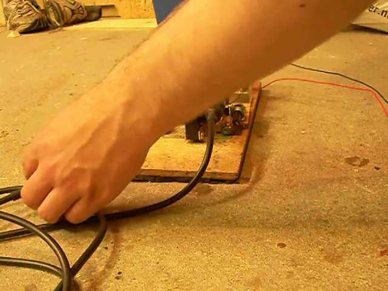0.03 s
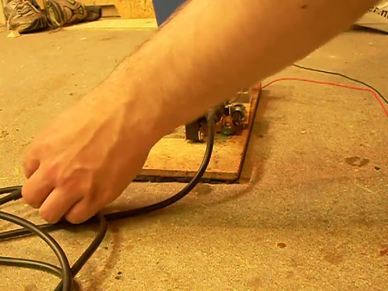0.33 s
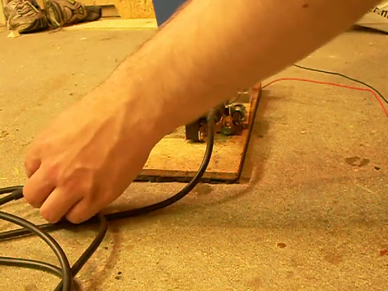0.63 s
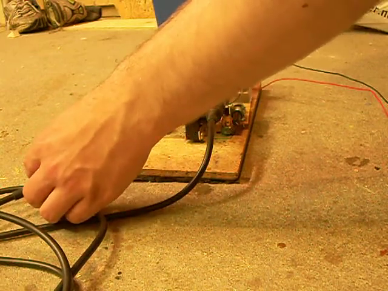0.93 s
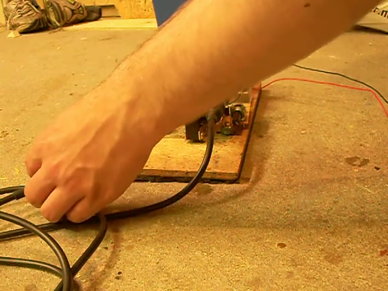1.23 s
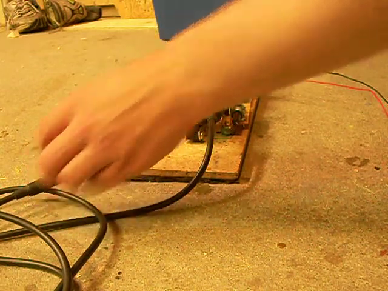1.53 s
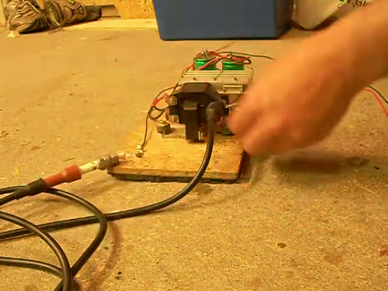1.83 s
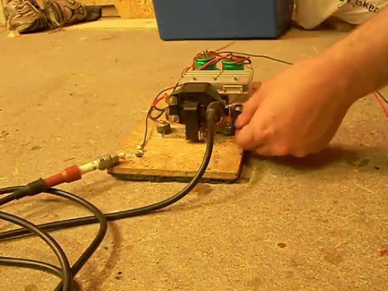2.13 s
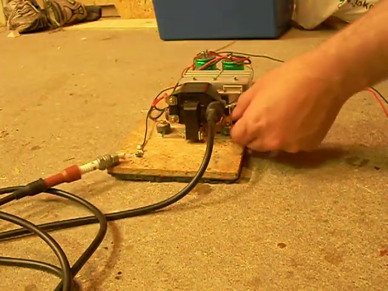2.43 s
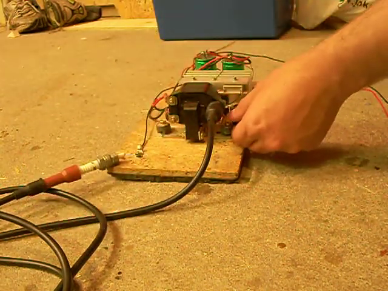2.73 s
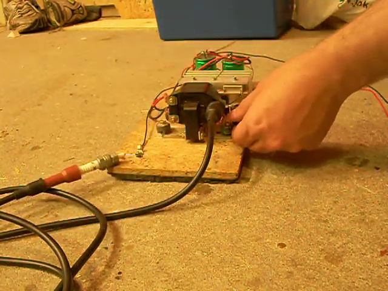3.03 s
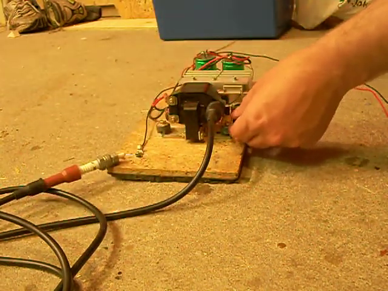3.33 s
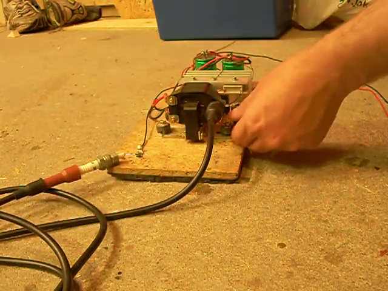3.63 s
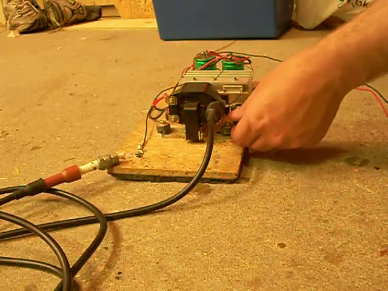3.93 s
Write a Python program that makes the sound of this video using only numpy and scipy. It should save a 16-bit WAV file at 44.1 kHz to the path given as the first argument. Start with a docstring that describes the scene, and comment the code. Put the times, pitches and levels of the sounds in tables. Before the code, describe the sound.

An electric spark buzzes at a spark plug, close by in a workshop. First a coil ticks faintly and rapidly, with sharp snaps near 0.6 and 1 second. At 1.1 the spark catches into a harsh buzz lasting until 4, changing tone around 1.6. Its pitch rises slightly from 2.6 and settles by 3.3. Fingers softly bump wood four times between 2.2 and 3.5, over faint rumble and hiss.

```python
"""An electric spark buzzes at a spark plug as a homemade driver pulses a coil about 82 times a second.
At first the coil only ticks and a few lone sparks snap over; then the spark catches, and its quick
cracks blend into a buzz. A hand uncovers the plug, changing the tone, then turns the pulse rate up and
down with a knob. Fingers bump a wooden board, and the workshop rumbles and hisses faintly.
The high treble is lost, and the loudest cracks overload."""
import sys
import numpy as np
from scipy import signal
from scipy.fft import rfft, irfft, next_fast_len
from scipy.io import wavfile
from scipy.ndimage import uniform_filter1d, map_coordinates

SR = 44100
rng = np.random.default_rng(int(sys.argv[2]) if len(sys.argv) > 2 else 0)


def digitize_waveform(pressure):
    """Quantize a signal to 16-bit integers and store it at the path in sys.argv[1].

    Rows of a 2-D input are taken as channels; values are limited to [-1, 1].
    """
    field = np.atleast_2d(pressure).T
    bounded = np.clip(field, -1, 1)
    quanta = np.round(bounded * 32767).astype(np.int16)
    wavfile.write(sys.argv[1], SR, quanta)


N = 176400  # 4 seconds

# tone of the room's rumble and of its hiss (frequency [Hz], relative level [dB])
RUMBLE_TONE = [(12, -31), (20, -1.5), (117, -2.5), (173, -6), (295, -9), (338, -14), (369, -11),
               (700, -22.5), (910, -54.5), (1540, -120)]
HISS_TONE = [(300, -3), (700, -1.5), (2000, -5), (4000, -7), (4500, -1.5), (5100, -9), (5600, -18.5),
             (6300, -31.5)]
# how long the room rings; a fade time, or t60, is the time to drop 60 dB (frequency [Hz], fade time [s])
ROOM_FADE = [(400, 0.16), (1500, 0.28), (3500, 0.32), (6000, 0.24)]
# notes at which the room and the board ring (frequency [Hz], relative level [dB], fade time [s])
ROOM_NOTES = [(514, -42, .2), (637, -39.5, 0.18), (782, -38, 0.24), (999, -43.5, 0.18)]
BOARD_NOTES = [(600, 2, 0.061), (800, -2, 0.045), (1190, -1, 0.044)]
# fingers bumping the board (time [s], peak level [dB])
BUMPS = [(2.179, -30), (2.448, -24.5), (3.079, -20.5), (3.459, -24)]
# how often the driver fires the coil (time [s], rate [Hz])
PULSE_RATE = [(0, 82.3), (1.0, 82.35), (1.1, 81.66), (2.57, 81.65), (2.7, 85.9), (2.82, 90), (2.9, 91.6),
              (3.01, 91.7), (3.1, 89.2), (3.21, 84), (3.29, 81.68)]
# strength of the ticking (time [s], level [dB])
TICK_LEVEL = [(0, -43.5), (.35, -43), (.52, -38.5), (.75, -38.5), (.86, -38), (.96, -39), (1.1, -33)]
# ticks that are harder than the rest (time [s], extra level [dB])
HARD_TICKS = [(.369, 2), (.442, 3.5), (.831, 3.5), (.843, 6.5), (.904, 4), (.928, 7.5), (1.001, 4.5)]
# lone sparks before the buzz starts (time [s], level [dB])
SNAPS = [(.5394, -18), (.6002, -20), (.6123, -17), (0.6248, -16.5), (1.0255, -16.5), (1.0735, -18)]
# tone of a tick and of a lone spark (frequency [Hz], relative level [dB])
TICK_TONE = [(350, -31), (700, -13.5), (1000, -10.5), (1300, -15), (1800, -2), (2200, -7.5), (2750, -0.5),
             (3200, -3), (3600, -4), (4200, -4.5), (4800, -6), (5200, -15.5), (5600, -26), (6300, -34)]
SNAP_TONE = [(200, -26.5), (400, -19), (600, -13), (800, -13), (1000, -6), (1350, -10.5), (1850, -4.5),
             (2600, -1.5), (3500, -1), (3900, -2), (4400, 4), (5100, 0.5), (5600, -15), (6300, -28.5)]
# strength of the buzzing spark (time [s], level [dB])
SPARK_LEVEL = [(1.1, -17), (1.25, -16.5), (1.4, -15.5), (1.46, -17), (1.52, -15.5), (1.58, -18), (2.0, -19),
               (2.55, -19.5), (2.65, -19.5), (2.82, -20), (2.97, -19), (3.1, -20), (3.3, -20),
               (3.65, -20.5), (4.0, -19.5)]
# how much of the plug the hand has uncovered (time [s], share [0-1])
UNCOVERED = [(1.55, 0.04), (1.62, 0.6), (1.82, 0.85)]
# how late the echo off the moving hand arrives (time [s], delay [s])
HAND_DELAY = [(1.1, 0.00062), (1.5, 0.0006), (1.62, 0.0012), (1.85, .0019), (2.1, 0.0022), (3.3, .0021),
              (3.65, 0.00219), (3.8, 0.002), (4.0, 0.0024)]
# harmonics of the buzz, plug covered and plug open (multiple of IDLE_HZ [number], relative level [dB])
COVERED_HARMONICS = [(1, -32.5), (2, -24), (3, -22.5), (4, -21.5), (5, -17.5), (6, -21.5), (7, -14),
                     (8, -28), (9, -19), (10, -15), (11, -19), (12, -11.5), (13, -15.5), (14, -17),
                     (15, -19), (16, -18), (17, -16), (18, -16.5), (19, -16), (20, -15.5), (21, -10.5),
                     (22, -11), (23, -11), (24, -22), (25, -9), (26, -22.5), (27, -10), (28, -16.5),
                     (29, -23.5), (30, -11), (31, -6.5), (32, -14.5), (33, -4.5), (34, -10), (35, -11.5),
                     (36, -8), (37, -27), (38, -16), (39, -12.5), (40, -10), (41, -10), (42, -13),
                     (43, -9.5), (44, -2.5), (45, -11), (46, -9), (47, -2), (48, -25), (49, -28), (50, -13),
                     (51, -1.5), (52, 0), (53, 2.5), (54, 1), (55, -17), (56, -17.5), (57, -7.5),
                     (58, -6.5), (59, -4), (60, -12), (61, -12), (62, -3), (63, -18), (64, -11), (65, -16),
                     (66, -19.5), (67, -29), (68, -39), (69, -15.5), (70, -22), (71, -24), (72, -31.5),
                     (73, -25), (74, -37.5)]
OPEN_HARMONICS = [(1, -28), (2, -27.5), (3, -25.5), (4, -22), (5, -18.5), (6, -21.5), (7, -12), (8, -17.5),
                  (9, -22), (10, -17), (11, -25.5), (12, -14.5), (13, -10), (14, -13), (15, -19),
                  (16, -15.5), (17, -24), (18, -26), (19, -34), (20, -15), (21, -11), (22, -14.5),
                  (23, -16), (24, -14.5), (25, -7), (26, -16.5), (27, -13.5), (28, -19.5), (29, -10),
                  (30, -24), (31, -7.5), (32, -13), (33, -5), (34, -8), (35, -27), (36, -3.5), (37, -27),
                  (38, -16), (39, -16), (40, -12.5), (41, -3), (42, -4.5), (43, -2), (44, -3), (45, -3.5),
                  (46, -12), (47, -8.5), (48, -9), (49, -12), (50, -1), (51, -13), (52, -6), (53, -4.5),
                  (54, -3.5), (55, 0), (56, -5.5), (57, -9.5), (58, 0), (59, -6), (60, -1), (61, -8),
                  (62, -4), (63, -5.5), (64, -11.5), (65, -13), (66, -20), (67, -16), (68, -25),
                  (69, -30.5), (70, -20), (71, -23.5), (72, -25), (73, -23.5), (74, -32)]
# how the room colours the ring of the buzzing spark (frequency [Hz], boost [dB])
ROOM_COLOUR = [(250, 2), (400, 2.5), (520, 2), (800, 4.5), (1100, 0.5), (1800, 0), (2700, -0.5),
               (3500, -1.5), (4300, 1), (5200, 0.5)]

IDLE_HZ, CATCH_S, MISFIRE_S = 81.65, 1.0982, 1.307  # resting pulse rate, start of the buzz, missed spark
JITTER_S, SPARK_SCATTER_DB, TICK_SCATTER_DB = 3e-6, 0.57, 0.95  # random change from pulse to pulse
HAND_SWAY_S, HAND_ECHO_DB = 2.5e-5, -17
EARLY_LEAN = 0.48  # tone shaping acts most at the start of each crack (0-1)
RUMBLE_DB, HISS_DB = -42, -46.5
SOFT_LIMIT, HARD_LIMIT, TREBLE_EDGE_HZ, TOP_HZ = 0.76, 0.6, 6000, 16000


def amp(db):
    """Turn decibels into a number to multiply by."""
    return 10 ** (np.asarray(db) / 20)


def unit(x):
    """Scale a sound to an average strength (rms) of 1."""
    return x / np.sqrt(np.mean(x ** 2) + 1e-20)


def at_frequency(points, hz):
    """Read between the rows of a (frequency, value) table, on a log scale of frequency."""
    frequencies, values = np.transpose(points)
    return np.interp(np.log(hz + 1), np.log(frequencies + 1), values)


def at_time(points, times):
    """Read between the rows of a (time, value) table."""
    return np.interp(times, *np.transpose(points))


def filtered(x, gain_at):
    """Multiply each frequency in a sound by gain_at(frequency)."""
    size = next_fast_len(N + SR // 2)
    return irfft(rfft(x, size) * gain_at(np.fft.rfftfreq(size, 1 / SR)), size)[:N]


def coloured(x, tone):
    """Give a sound a tone, using a filter that rings only after each click, never before."""
    size = 8192
    cepstrum = irfft(np.log(amp(at_frequency(tone, np.fft.rfftfreq(size, 1 / SR)))))
    cepstrum[1:size // 2] *= 2  # move the early half of the ringing to after the click
    cepstrum[size // 2 + 1:] = 0
    ring = irfft(np.exp(rfft(cepstrum)))[:size // 2]
    return signal.fftconvolve(x, ring)[:len(x)]


def clicks(times, sizes):
    """Sharp clicks at exact times, even between two samples."""
    index = np.floor(times * SR).astype(int)[:, None] + np.arange(-7, 9)
    offset = index - times[:, None] * SR
    taps = sizes[:, None] * np.sinc(offset) * np.cos(np.pi * offset / 16) ** 2
    return np.bincount(np.clip(index, 0, N).ravel(), taps.ravel(), N + 1)[:N]


def played(train, sound):
    """Play the sound once for every click in the train."""
    return signal.fftconvolve(train, sound)[:N]


def unit_when_repeated(sound):
    """Scale a short sound so that repeating it at the resting rate gives an rms near 1."""
    return sound / np.linalg.norm(sound) * np.sqrt(SR / IDLE_HZ)


def ringing(notes, t):
    """Add up pure tones that each die away."""
    return sum(amp(db - 60 * t / t60) * np.sin(2 * np.pi * hz * t) for hz, db, t60 in notes)


def background():
    """The room's low rumble and faint hiss: two steady, filtered noises."""
    def noise(tone):
        return unit(filtered(rng.standard_normal(N), lambda hz: amp(at_frequency(tone, hz))))
    return amp(RUMBLE_DB) * noise(RUMBLE_TONE) + amp(HISS_DB) * noise(HISS_TONE)


def workshop(near_db, near_t60, room_db, echoes=()):
    """A click in the room: direct sound, scatter off the nearby board, echoes and a ringing tail."""
    hz, frame_times, spectrum = signal.stft(rng.standard_normal(SR // 2), SR, nperseg=256)
    fade = amp(-60 * frame_times / at_frequency(ROOM_FADE, hz)[:, None])
    tail = signal.istft(spectrum * fade, SR, nperseg=256)[1]
    t = np.arange(len(tail)) / SR
    tail *= 1 - np.exp(-t / 0.0059)  # the tail takes a moment to build
    near = rng.standard_normal(len(t)) * amp(-60 * t / near_t60) * (1 - np.exp(-t / 0.00028))
    sound = (amp(near_db) * unit(near) + amp(room_db) * unit(tail)) / np.sqrt(len(t))
    sound[0] += 1  # the direct sound
    for delay_s, gain in echoes:
        sound[round(delay_s * SR)] += gain
    return sound / np.linalg.norm(sound) + amp(room_db - 9.5) * ringing(ROOM_NOTES, t)


def finger_bumps():
    """Fingers knock softly on the wooden board, which rings briefly."""
    ring = ringing(BOARD_NOTES, np.arange(SR // 4) / SR)
    times, db = np.transpose(BUMPS)
    return played(clicks(times, amp(db)), ring / abs(ring).max())


def driver_firings():
    """The times when the driver fires the coil, once per cycle."""
    t = np.arange(N) / SR
    cycles = np.cumsum(at_time(PULSE_RATE, t)) / SR
    cycles -= np.interp(CATCH_S, t, cycles)  # one firing lands just as the spark catches
    return np.interp(np.arange(np.ceil(cycles[0]), cycles[-1]), cycles, t)


def coil_ticks(firings):
    """Until the spark catches, each firing gives a small dry tick."""
    times = firings[firings < CATCH_S]
    db = at_time(TICK_LEVEL, times) + TICK_SCATTER_DB * rng.standard_normal(len(times))
    for when, extra_db in HARD_TICKS:
        db[np.argmin(abs(times - when))] += extra_db
    train = clicks(times + rng.normal(0, 8e-6, len(times)), amp(db))
    tick = coloured(workshop(near_db=-7.5, near_t60=0.014, room_db=-4.5), TICK_TONE)
    return played(train, unit_when_repeated(tick))


def lone_sparks():
    """A few sparks jump before the buzz starts, each a dry snap that the room answers."""
    times, db = np.transpose(SNAPS)
    snap = coloured(workshop(near_db=-0.5, near_t60=0.01, room_db=-3.0), SNAP_TONE)
    return played(clicks(times, amp(db)), unit_when_repeated(snap))


def spark_crack(room, harmonics):
    """One spark in the room, shaped so that repeating it gives roughly the listed harmonics."""
    multiple, db = np.transpose(harmonics)
    hz, period = np.round(multiple) * IDLE_HZ, round(SR / IDLE_HZ)
    wanted = amp(db) * period / np.sqrt(2 * np.sum(amp(db) ** 2))  # for a buzz of rms 1
    broad_db = 10 * np.log10(uniform_filter1d(wanted ** 2, size=5))
    crack = coloured(room, np.c_[hz, broad_db + at_frequency(ROOM_COLOUR, hz)])
    # tone shaping gives each harmonic of the buzz about its listed strength
    size = 2 ** 19
    present = rfft(crack, size)[np.round(hz * size / SR).astype(int)]
    change = present * (wanted / abs(present) - 1)
    waves = np.exp(2j * np.pi * np.outer(np.arange(period) / SR, hz))
    tone_shaping = 2 / period * (waves @ change).real
    crack[:period] += tone_shaping * np.linspace(1 + EARLY_LEAN, 1 - EARLY_LEAN, period)
    return crack


def spark_buzz(firings):
    """Once caught, the spark jumps at every firing but one; its tone changes as the hand lifts."""
    half_period = 0.5 / IDLE_HZ
    times = firings[(firings > CATCH_S - half_period) & (abs(firings - MISFIRE_S) > half_period)]
    times = times + JITTER_S * rng.standard_normal(len(times))
    sizes = amp(at_time(SPARK_LEVEL, times) + SPARK_SCATTER_DB * rng.standard_normal(len(times)))
    uncovered = at_time(UNCOVERED, times)
    sway = map_coordinates(rng.standard_normal(40), [times * 4], mode="mirror")  # slow, smooth drift
    echo_times = times + at_time(HAND_DELAY, times) + HAND_SWAY_S * sway

    def buzz(gains, room, harmonics):
        train = clicks(times, gains) + clicks(echo_times, gains * amp(HAND_ECHO_DB))
        return played(train, spark_crack(room, harmonics))

    covered_room = workshop(near_db=1, near_t60=0.011, room_db=-3)
    open_room = workshop(near_db=-1, near_t60=0.013, room_db=0.5, echoes=[(0.0012, 0.94), (0.0043, 0.48)])
    covered_buzz = buzz(sizes * (1 - uncovered) ** 0.81, covered_room, COVERED_HARMONICS)
    open_buzz = buzz(sizes * uncovered ** 0.52, open_room, OPEN_HARMONICS)
    return covered_buzz + open_buzz


def scene():
    """Coil, sparks, fingers and room, all heard at one microphone."""
    firings = driver_firings()
    mix = coil_ticks(firings) + lone_sparks() + spark_buzz(firings) + finger_bumps() + background()
    return mix[None]


def record(dry):
    """Loud peaks are squashed, the high treble is lost, and the loudest cracks clip harshly."""
    squashed = dry[0] / (1 + abs(dry[0] / SOFT_LIMIT) ** 4) ** (1 / 4)
    dulled = filtered(squashed, lambda hz: amp(-np.clip((hz - TREBLE_EDGE_HZ) / 55, 0, 12) ** 2))
    flattened = np.clip(dulled, -HARD_LIMIT, HARD_LIMIT)
    return filtered(flattened, lambda hz: hz < TOP_HZ)[None]


dry = scene()
out = record(dry)
digitize_waveform(out)
```